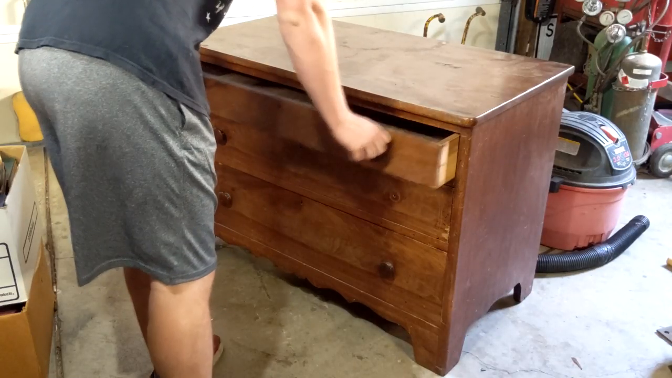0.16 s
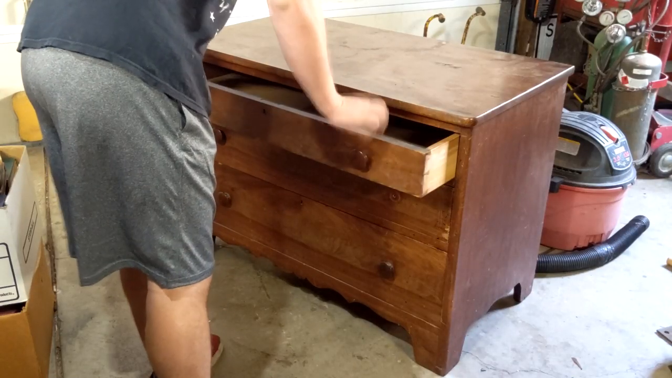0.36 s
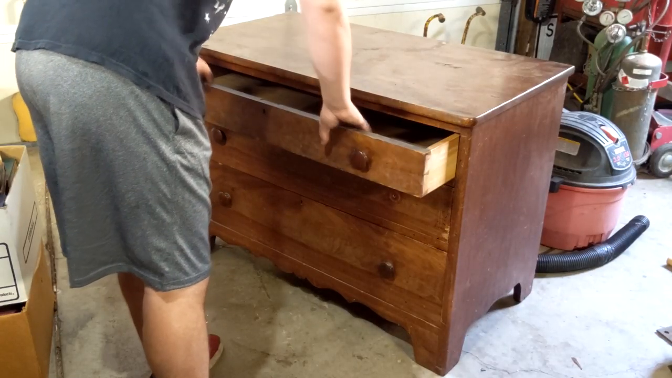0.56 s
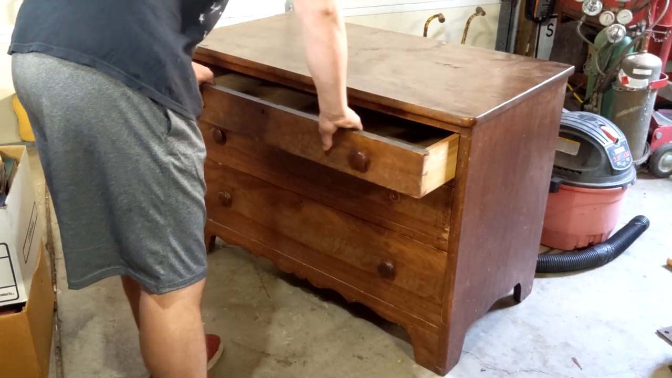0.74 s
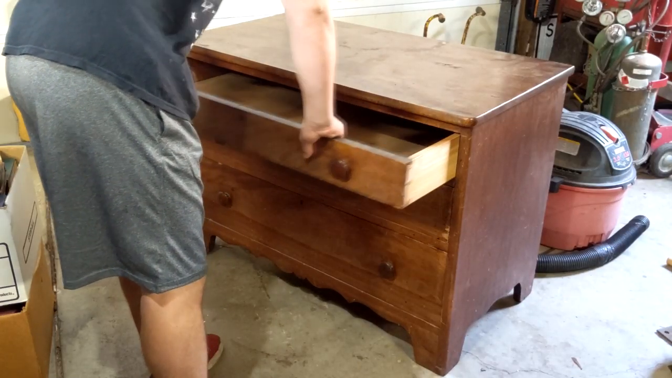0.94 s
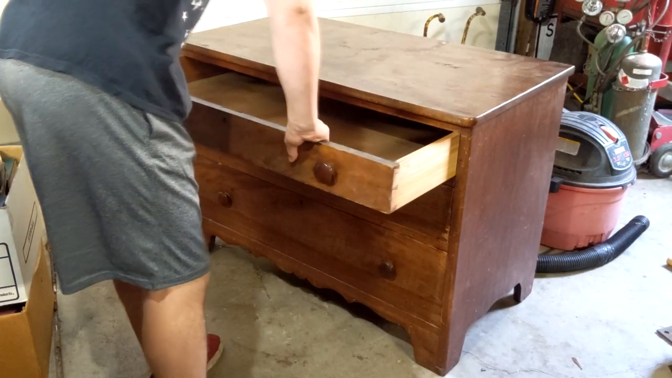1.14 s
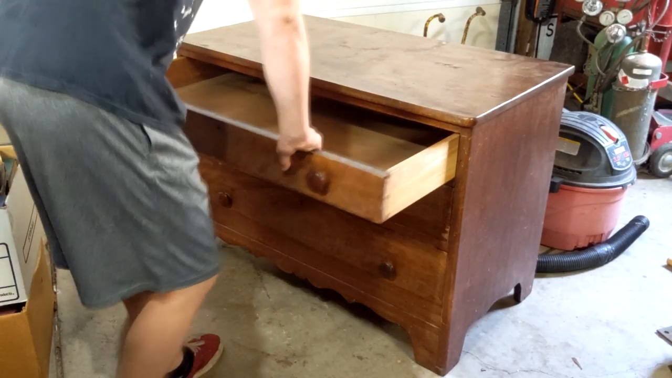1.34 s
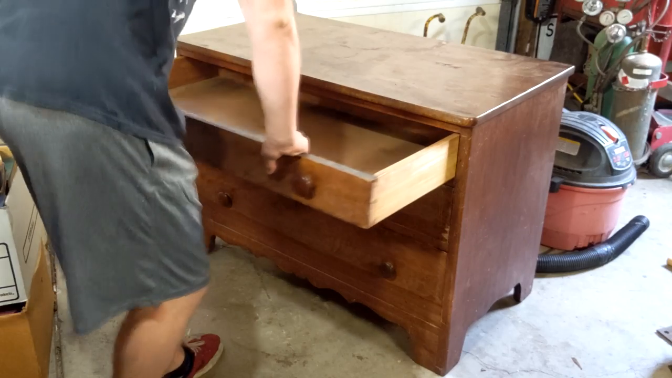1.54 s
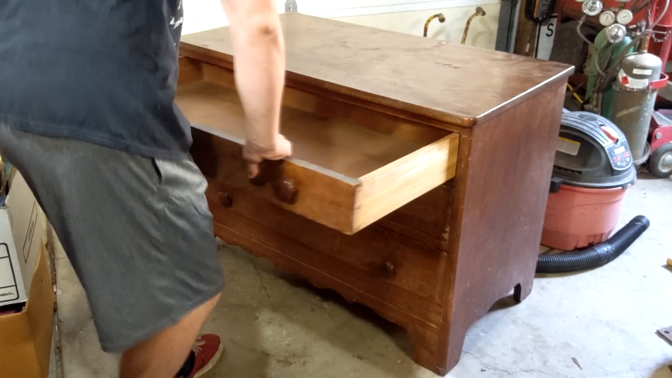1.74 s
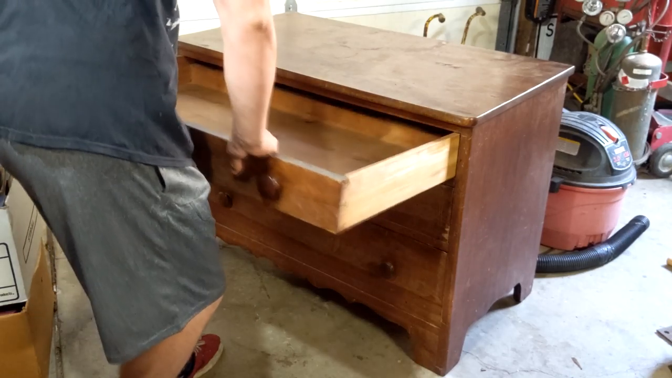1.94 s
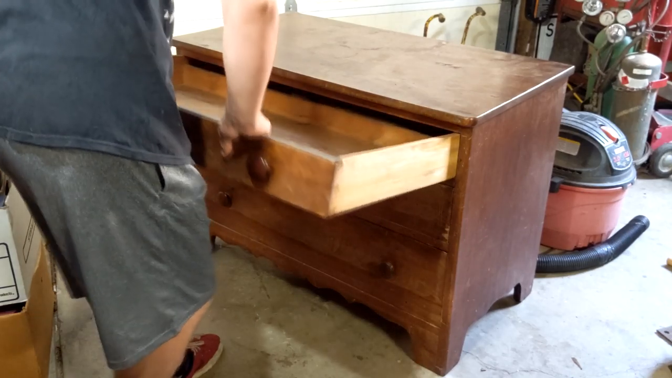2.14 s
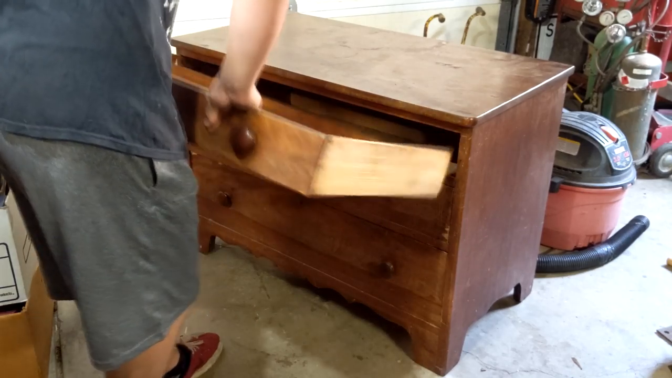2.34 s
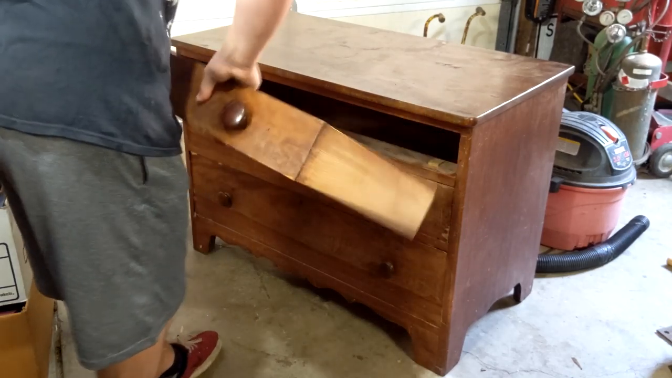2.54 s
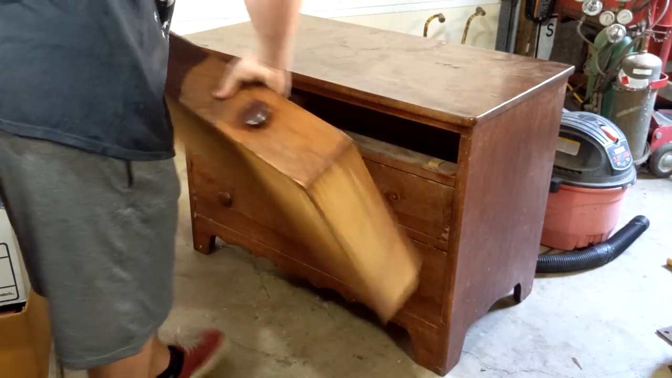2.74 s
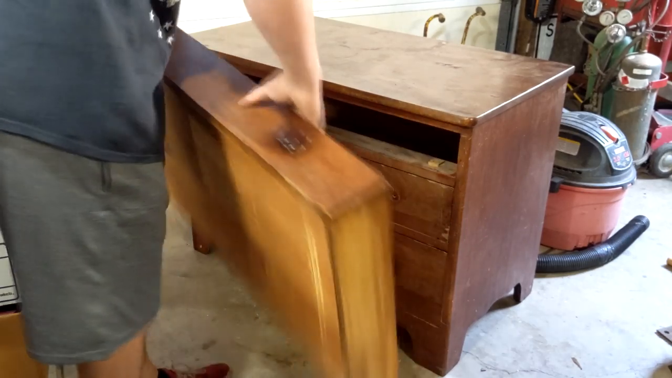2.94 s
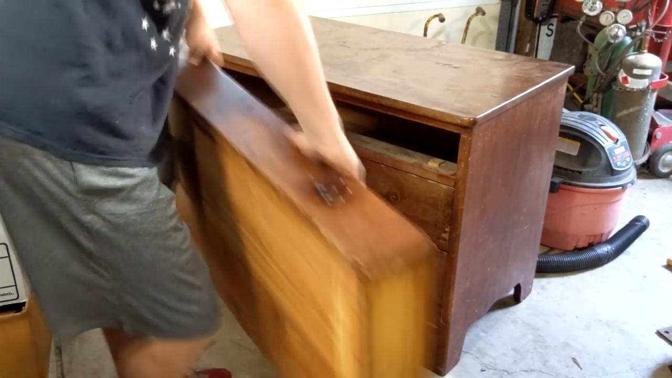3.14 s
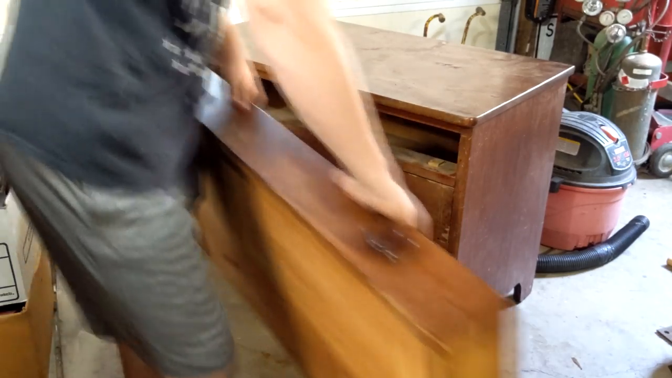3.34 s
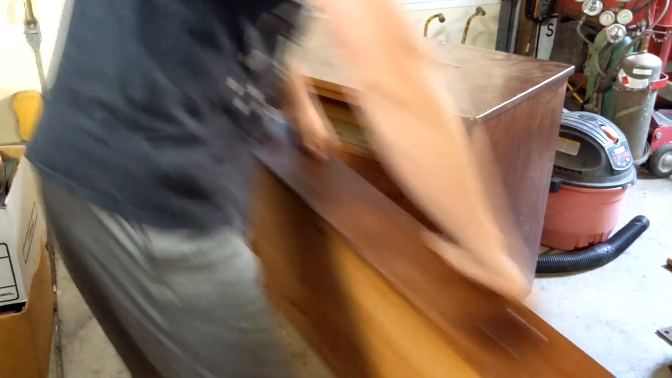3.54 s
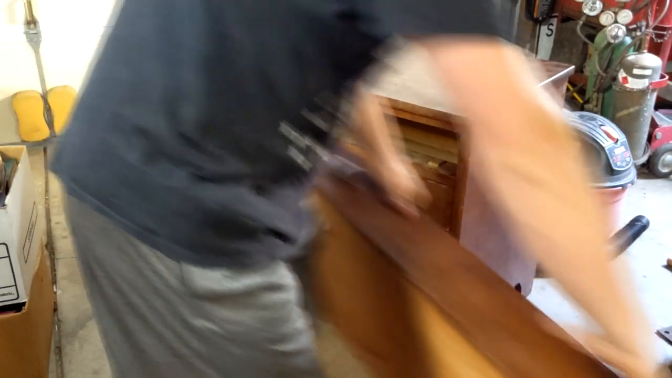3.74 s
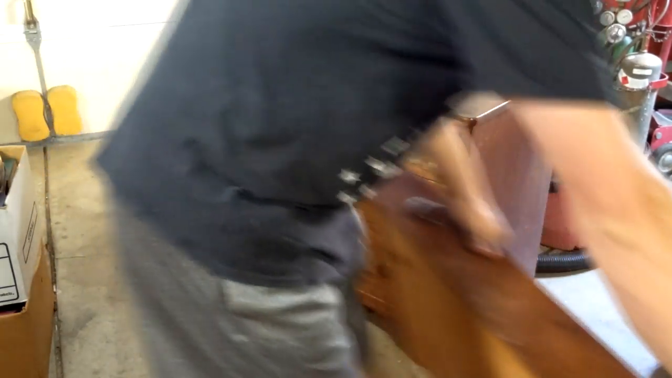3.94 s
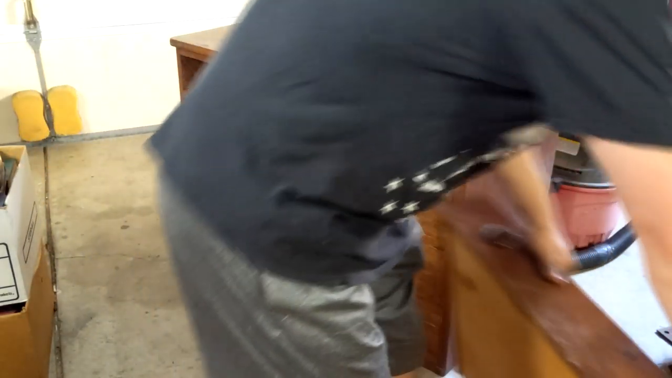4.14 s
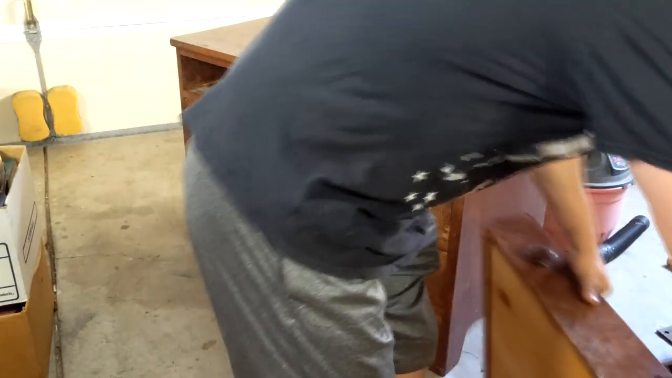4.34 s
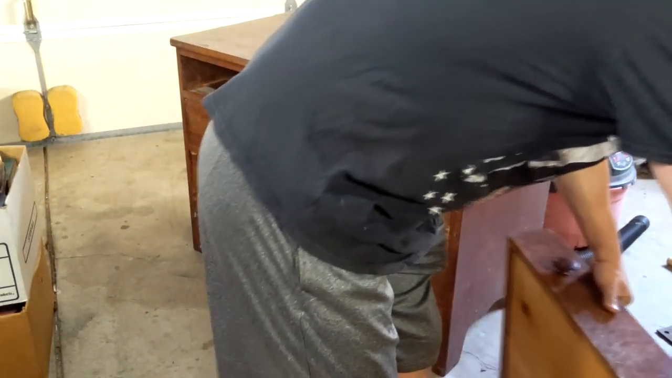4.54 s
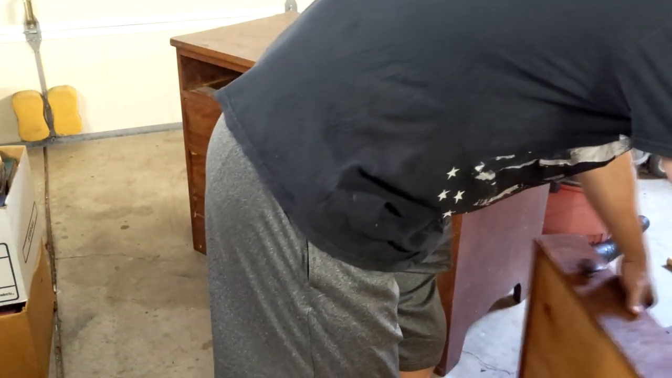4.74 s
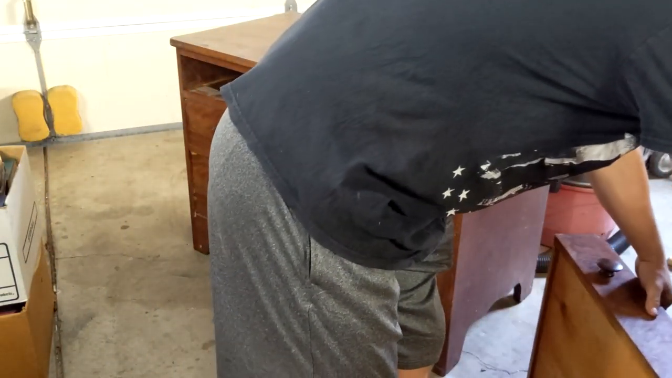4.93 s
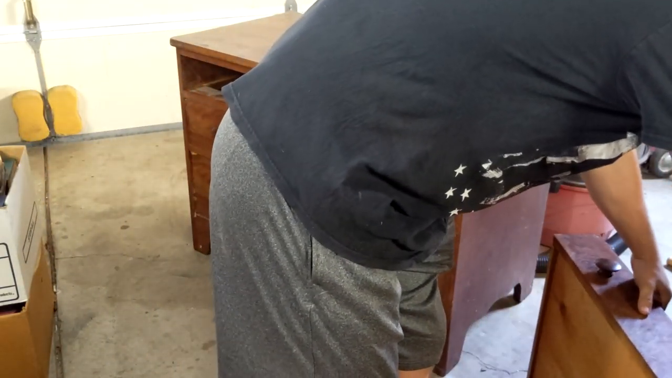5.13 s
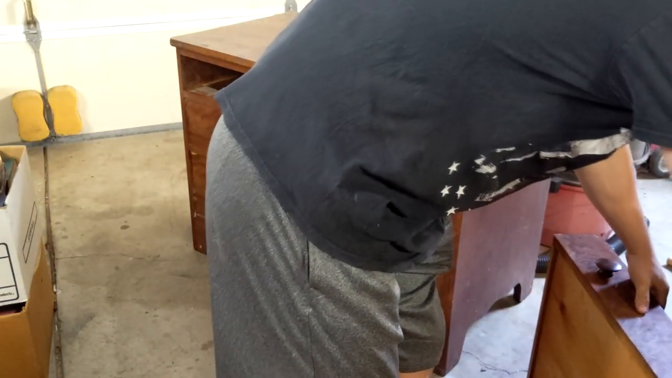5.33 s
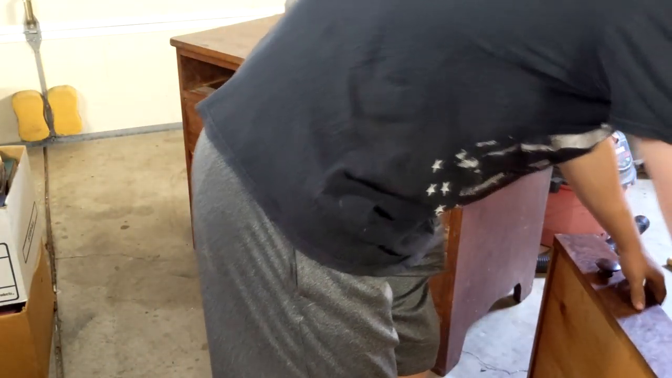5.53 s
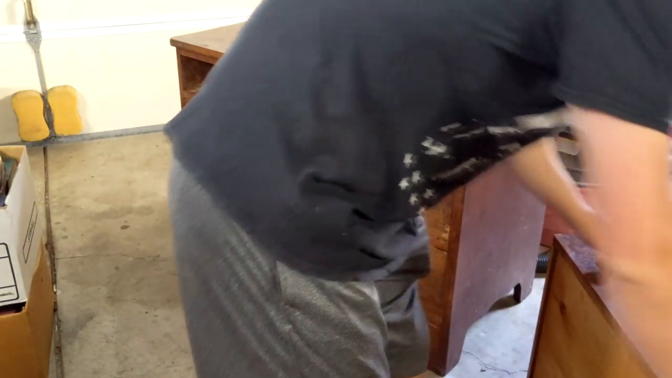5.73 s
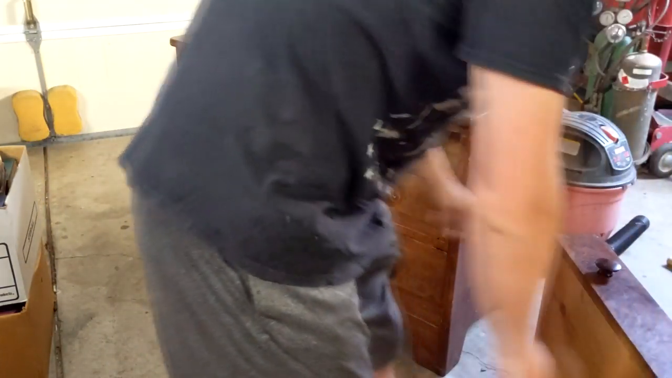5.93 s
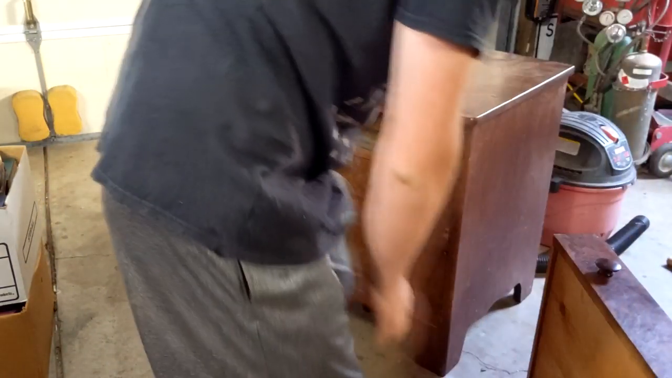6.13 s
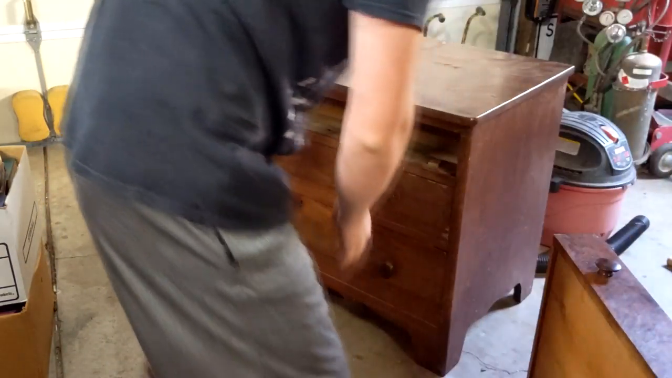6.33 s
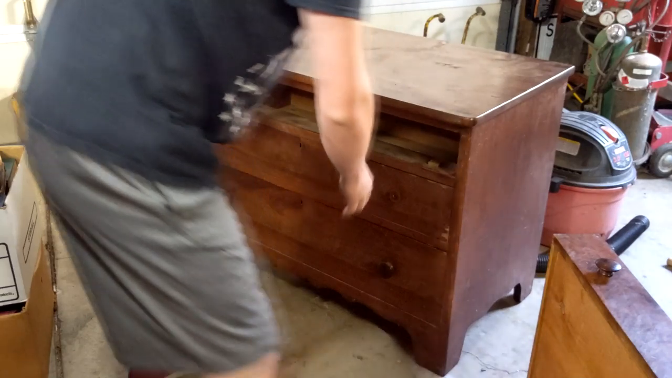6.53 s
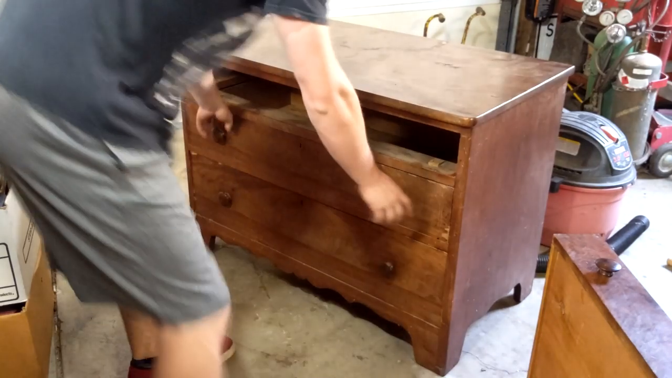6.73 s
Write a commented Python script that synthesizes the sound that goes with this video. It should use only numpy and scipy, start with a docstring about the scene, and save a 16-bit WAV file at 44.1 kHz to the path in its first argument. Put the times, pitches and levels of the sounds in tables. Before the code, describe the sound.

A wooden drawer starts rasping out of an old chest right away, moving in uneven tugs with hollow knocks at about 0.3 and 0.6 seconds. At 1 second it binds and judders with a loud, booming knock, and again more softly at 1.3 seconds. Shoes and clothes swish around 1.6 seconds, and the scraping ends with smaller bumps by 2.6 seconds. Soft steps and cloth rustle follow from 3 to 4.3 seconds. At about 4.6 seconds one corner of the drawer knocks loudly on concrete. From 4.9 to 5.3 seconds its edge grinds over grit with tiny squeaks and several knocks, then drops and settles. Clothes brush again near 6 seconds, with light taps at 6.4 and 6.6 seconds. Everything is heard in stereo in a garage with short, hard echoes and a faint steady hum.

```python
"""A wooden drawer rasps, sticks and judders on its runners as it is tugged out of an old chest.
It is carried aside and stood on the concrete, where it knocks, scrapes over grit and settles.
Each contact rings the wood's modes and thin boards; jolts make the panels boom. Shoes and clothes
brush and tap over a faint hum. Heard in stereo in a garage with close, hard walls."""
import sys
import numpy as np
from scipy import signal
from scipy.fft import rfft, irfft, next_fast_len
from scipy.io import wavfile

SR = 44100
rng = np.random.default_rng(int(sys.argv[2]) if len(sys.argv) > 2 else 0)


def put_to_file(sound):
    """Save the sound as 16-bit audio at rate SR, in the file named by the first command-line argument."""
    columns = np.atleast_2d(sound).T  # one column per channel
    safe = np.clip(columns, -1, 1)
    whole_steps = np.round(safe * 32767)
    wavfile.write(sys.argv[1], SR, whole_steps.astype(np.int16))


N = 298998
TIME = np.arange(N) / SR

# spectrum of the dense, short ring of thin boards: f/Hz, level/dB
BOARDS = [(60, -5), (150, 6.5), (400, 0), (900, -1.5), (1400, -8), (2100, -14.5), (3300, -13), (4500, -19),
          (5700, -11), (7000, -18), (10000, -15), (16000, -45)]
# tugs, each sliding the drawer until it binds: start/s, end/s, chest rumble/dB, runner rasp/dB
TUGS = [(0.083, 0.246, -52, -56), (0.234, 0.61, -42, -56.5), (0.599, 1, -40.5, -65),
        (0.998, 1.301, -43, -56.5), (1.305, 1.868, -38.5, -53.5), (1.851, 2.137, -61.5, -57.5),
        (2.14, 2.399, -43, -57.5), (2.389, 2.563, -43.5, -55.5)]


def amp(db):
    """Decibels to gain."""
    return 10 ** (np.asarray(db) / 20)


def unit(x):
    """Scale to rms 1."""
    return x / np.sqrt(np.mean(x ** 2))


def burst(x):
    """Scale to energy 1."""
    return x / np.sqrt(np.sum(x ** 2))


def add(track, s, sound):
    """Mix a sound in at s seconds."""
    i = int(s * SR)
    track[i:i + len(sound)] += sound[:N - i]


def fade(t60):
    """One second of exponential decay."""
    return np.exp(-np.log(1000) * TIME[:SR] / t60)


def swell(t, start, peak, end):
    """A rounded rise and fall between 0 and 1."""
    return np.sin(np.pi / 2 * np.interp(t, [start, peak, end], [0, 1, 0]))


def stroke(start, end, attack_s, release_s, sag_db_per_s=0):
    """A sliding movement: quick start, slow sag, dying away after its end."""
    age = np.maximum(TIME - start, 0)
    dying = np.exp(-np.maximum(TIME - end, 0) / release_s)
    return np.minimum(age / attack_s, 1) * amp(-sag_db_per_s * age) * dying


def waver(rate, depth_db):
    """A gain that wanders at random."""
    knots = rng.standard_normal(SR // 20)
    return amp(depth_db * np.interp(TIME * rate, np.arange(len(knots)), knots))


def colour(x, points):
    """Filter by a spectrum of points: f/Hz, level/dB."""
    hz, db = np.transpose(points)
    size = next_fast_len(x.shape[-1])
    f = np.fft.rfftfreq(size, 1 / SR)
    gain = amp(np.interp(np.log(f + 1), np.log(hz), db))
    return irfft(rfft(x, size) * gain, size)[..., :x.shape[-1]]


def soften(x, hz):
    """A soft contact passes little above its corner."""
    return signal.sosfilt(signal.butter(2, min(hz, SR / np.e), fs=SR, output="sos"), x)


def ring(x, response):
    """Play a force through the first half second of an impulse response."""
    return signal.fftconvolve(x, response[:SR // 2])[:N]


def modes(table):
    """One damped sine for each mode, weighted by its energy."""
    return np.array([amp(db) / np.sqrt(t60) * fade(t60) * np.sin(2 * np.pi * hz * TIME[:SR]) * (-1) ** k
                     for k, (hz, db, t60) in enumerate(table)])


def grit(rate, spread_db, size=N):
    """Tiny slips of uneven size at random moments; rms 1."""
    slips = (rng.random(size) < rate / SR) * np.sign(rng.standard_normal(size))
    return unit(slips * amp(spread_db * np.clip(rng.standard_normal(size), -2, 2)))


def diffuse(size, side_db):
    """Noise reaching the microphones from all around: alike in the bass, wide in the treble."""
    # stereo width, side against mid: f/Hz, level/dB
    width = [(40, -23.5), (120, -20), (300, -5.5), (900, -4.5), (2000, 0), (15000, 0.5)]
    mid, side = rng.standard_normal((2, size))
    side = amp(side_db) * colour(side, width)
    return np.array([mid + side, mid - side]) / np.sqrt(2)


def garage(x, wet_db, t60, side_db, pan_db, gap_s=0.0041):
    """Direct sound at the microphones, then the echoes of close, hard walls."""
    # colour of the reverberation: f/Hz, level/dB
    echo = [(60, 4.5), (150, -2), (400, 3.5), (1000, 0), (3000, 3), (15000, 1.5)]
    tail = diffuse(SR, side_db) * fade(t60) * np.clip(TIME[:SR] / gap_s - 1 / 2, 0, 1)
    response = amp(wet_db) * colour(unit(tail), echo) / np.sqrt(SR)
    response[:, 0] += 1  # the direct path
    response /= np.sqrt(1 + amp(wet_db) ** 2)
    return np.array([ring(x, h) * amp(side * pan_db / 2) for h, side in zip(response, (1, -1))])


def room_tone(air_db=-55):
    """Low rumble and airy hiss from all around, with a faint wavering hum."""
    # spectrum of the room's air: f/Hz, level/dB
    air_spectrum = [(12, -37), (20, -10), (56, 2), (108, -13), (194, -13.5), (377, -26), (470, -20),
                    (555, -26), (620, -23), (693, -23.5), (940, -24.5), (1170, -31.5), (1830, -42.5),
                    (3860, -39), (15000, -46.5)]
    # tones of the hum: f/Hz, level/dB
    hum_tones = [(51, -73), (70, -70.5), (667, -83)]
    air = amp(air_db) * unit(colour(diffuse(N, side_db=0.5), air_spectrum)) * waver(3.36, 1.0)
    hum = sum(amp(db) * unit(np.sin(2 * np.pi * hz * TIME) * waver(8.1, 3.3)) for hz, db in hum_tones)
    return air + hum


def footwork(rise_share=0.58, rustle_db=-70.5, tap_t60=0.02, tap_octaves=0.76):
    """Soles and cloth brush in soft swishes; steps and touches give short dull taps."""
    # shoes and clothes brushing: peak t/s, length/s, level/dB
    brushes = [(1.34, 0.081, -55), (1.434, 0.083, -51), (1.587, 0.19, -43), (3.145, 0.33, -53.5),
               (3.367, 0.22, -63), (3.67, 0.069, -65), (4.01, 0.12, -68), (4.234, 0.064, -59.5),
               (5.934, 0.34, -53.5), (6.221, 0.13, -61.5), (6.388, 0.048, -54), (6.654, 0.12, -62.5),
               (6.78, 0.14, -61.5)]
    # spectrum of the brushing: f/Hz, level/dB
    brush_spectrum = [(150, -20), (500, 1), (1000, 0.5), (2000, -5), (3100, -0.5), (4400, -5), (5800, -1.5),
                      (7000, -7.5), (10000, -11), (15000, -18)]
    # light steps and taps: t/s, level/dB, centre f/Hz, contact/s
    taps = [(2.98, -26.5, 740, .05), (3.105, -24.5, 430, .035), (3.181, -17, 845, 0.019),
            (3.644, -30, 750, 0.0043), (3.99, -22.5, 614, 0.047), (4.293, -29, 750, 0.014),
            (6.362, -22.5, 990, 0.016), (6.618, -16, 980, 0.00076)]
    pressure = sum(amp(db) * swell((TIME - s) / length, -rise_share, 0, 1 - rise_share) ** 2
                   for s, length, db in brushes)
    carrying = stroke(3.61, 4.5, attack_s=0.088, release_s=0.08)
    pressure += amp(rustle_db) * carrying * waver(11, 1.4)
    out = unit(colour(grit(7000, 3.2), brush_spectrum)) * pressure * waver(80, 1.78)
    for s, db, hz, contact in taps:
        band = signal.butter(2, [hz / 2 ** tap_octaves, hz * 2 ** tap_octaves], "band", fs=SR,
                             output="sos")
        push = ring(fade(tap_t60), np.hanning(int(contact * SR) + 3))[:SR]
        tap = soften(signal.sosfilt(band, rng.standard_normal(SR) * push), 1.27 * hz)
        add(out, s, amp(db) * burst(tap))
    return out


def booms(hits, notes, linger_db=-16, linger_t60=0.59):
    """A panel and the air behind it trade energy, so each note swells, drops and lingers faintly."""
    out = np.zeros(N)
    for s, *levels in hits:
        for db, (hz, rise) in zip(levels, notes):
            age = TIME[:SR] / rise
            bloom = (age * np.exp(1 - age)) ** 2
            linger = amp(linger_db) * np.tanh(age) * fade(linger_t60)
            add(out, s, amp(db) * (bloom + linger) * np.sin(2 * np.pi * hz * TIME[:SR]))
    return out


def panels(flex_db=-3, flex_lag_s=0.0518):
    """Jolts boom in the carcass; tugs and landings flex the drawer bottom."""
    # deep notes of the hollow carcass: f/Hz, swell/s
    carcass = [(112.3, 0.029), (260, 0.02), (448, 0.023)]
    # jolts to the carcass: t/s, low note/dB, middle note/dB, high note/dB
    jolts = [(.295, -40, -40.5, -35.5), (.602, -21.5, -45.5, -50), (1.018, -30.5, -26, -37.5),
             (1.325, -39, -54, -56), (2.155, -68, -42, -41)]
    # notes of the drawer's thin bottom: f/Hz, swell/s
    bottom = [(52, 0.072), (147, 0.022)]
    # landings that flex the bottom: t/s, low note/dB, high note/dB
    landings = [(4.641, -60, -30.5), (4.942, -44, -38), (5.135, -54, -45), (5.202, -39.5, -37)]
    bends = [(start + flex_lag_s, db + flex_db) for start, _, db, _ in TUGS]  # low note only
    return booms(jolts, carcass) + booms(bends + landings, bottom)


def blows(contacts, box_modes, boards_db, boards_t60, vary):
    """Contacts on a wooden box: each spot rings its own mix of clear modes and dense board ring."""
    size = SR // 2
    out = np.zeros(N)
    shapes, dying = modes(box_modes)[:, :size], fade(boards_t60)[:size]
    for s, db, corner_hz in contacts:
        clear = (1 + vary * rng.standard_normal(len(box_modes))) @ shapes
        dense = colour(rng.standard_normal(size), BOARDS) * dying
        wood = burst(burst(clear) + amp(boards_db) * burst(dense))
        add(out, s, amp(db) * soften(wood, corner_hz))
    return out


def squeaks(detune=0.017, rise_s=0.013, length_s=0.023):
    """The drawer's edge catches on grit; each catch grips a new spot, which shifts the pitches."""
    # modes of end grain squeaking on grit: f/Hz, level/dB, t60/s
    end_grain = [(1190, 0, 0.041), (2100, -4, 0.027), (2436, 0, 0.049), (2820, -1, 0.051),
                 (3150, -3, 0.028), (3500, -5, 0.026), (4080, -11, .02), (4470, -9, 0.018),
                 (5470, -3, 0.011), (5860, 0, 0.012)]
    # the edge catching: t/s, level/dB
    catches = [(5.011, -43.5), (5.03, -41.5), (5.05, -42.5), (5.068, -49), (5.212, -51)]
    out = np.zeros(N)
    for start, db in catches:
        spot = [(hz * (1 + detune * rng.standard_normal()), level, t60) for hz, level, t60 in end_grain]
        slips = grit(2200, 3.1, size=SR) * swell(TIME[:SR], 0, rise_s, length_s)
        add(out, start, amp(db) * ring(slips, burst(modes(spot).sum(axis=0))))
    return out


def drawer_on_floor(drag_db=-42.5, crunch_t60=0.084, crunch_rise_s=0.0031):
    """One corner lands, the edge grinds and squeaks over grit, then the rest drops."""
    # modes of the free drawer: f/Hz, level/dB, t60/s
    drawer_modes = [(144, 1.5, 0.19), (175, 1.5, 0.044), (254, 3.5, 0.26), (332.7, -9.5, 0.51),
                    (449, -11.5, 0.12), (600, -18, 0.037), (667, -12, 0.042), (774, -1.5, 0.063),
                    (924, -4.5, 0.097), (1009, -5.5, 0.063), (1293, -10, 0.058), (1366, -10.5, 0.075),
                    (1508, -7, 0.038), (1738, -7.5, .04), (2855, -9, 0.026), (3244, -4, 0.025),
                    (3500, -11, 0.014)]
    # drawer meeting concrete: t/s, blow/dB, contact corner f/Hz, crunch/dB
    knocks = [(4.638, 2.5, 2000, -13), (4.65, 5, 1340, -17), (4.673, -3.5, 900, -26),
              (4.916, -15, 4000, -22), (4.938, -3.5, 3520, -10), (4.956, -0.5, 2470, -18),
              (4.99, -7.5, 1630, -29), (5.018, -5, 1510, -14.5), (5.133, -10.5, 2000, -17),
              (5.146, -4.5, 302, -18.5), (5.198, 0.5, 4540, -15.5), (5.226, -7.5, 445, -24)]
    # spectrum of crushed grit: f/Hz, level/dB
    crunch = [(300, -20), (1200, -2), (2100, -4), (3300, 0), (4500, -2), (5700, -1), (7000, -8),
              (10000, -11), (13000, -17), (16000, -22)]
    out = blows([row[:3] for row in knocks], drawer_modes, boards_db=2, boards_t60=0.096, vary=0.57)
    drag = amp(drag_db) * stroke(4.93, 5.16, attack_s=0.024, release_s=0.04, sag_db_per_s=7)
    scrape = colour(grit(1300, 5), BOARDS) / 2
    body = ring(grit(830, 5), burst(modes(drawer_modes).sum(axis=0)))
    out += drag * unit(scrape + body)
    crushing = fade(crunch_t60) * np.tanh(TIME[:SR] / crunch_rise_s)
    for s, _, _, db in knocks:
        grains = colour(grit(8000, 5, size=SR), crunch)
        add(out, s, amp(db) * burst(grains * crushing))
    return out + squeaks()


def tugging(attack_s=0.03, release_s=0.04):
    """Strength of the rumble and of the rasp; both sag as the drawer slows after each tug."""
    rumble, rasp = np.zeros((2, N))
    for start, end, rumble_db, rasp_db in TUGS:
        rumble += amp(rumble_db) * stroke(start, end, attack_s, release_s, sag_db_per_s=25)
        rasp += amp(rasp_db) * stroke(start, end, attack_s, release_s, sag_db_per_s=9.5)
    return rumble, rasp


def judder(slips_per_s=140, rise_share=0.22, jitter=0.1197, scatter_db=1.5):
    """The drawer binds and lets go in a quick, uneven train of slips."""
    # stick-slip on the runners: start/s, length/s, level/dB, contact corner f/Hz
    judders = [(0.267, 0.13, -13, 550), (.994, 0.13, -2.5, 1100), (1.303, 0.11, -11.5, 865),
               (1.539, .09, -20, 630), (2.12, 0.12, -11.5, 700)]
    slips = []
    for start, length, db, hz in judders:
        timing, strength = rng.standard_normal((64, 2)).T
        ages = np.cumsum(np.exp(jitter * timing)) / slips_per_s
        swell_db = 20 * np.log10(swell(ages / length, 0, rise_share, 1) + 1e-9)
        levels = db + scatter_db * strength + swell_db
        slips += [(start + age, level, hz) for age, level in zip(ages, levels) if age < length]
    return slips


def drawer_in_chest(rumble_hz=135, grain_db=-2):
    """Knocks, judder and sliding friction all shake the same carcass."""
    # modes of the chest with the drawer in it: f/Hz, level/dB, t60/s
    chest_modes = [(114.5, -2, 0.29), (166.7, -11.5, 0.49), (192, -11, 0.18), (260, -1.5, 0.097),
                   (289.6, -6.5, 0.2), (341.3, -4.5, 0.28), (412, -7.5, 0.16), (444.8, -2, 0.23),
                   (562, -4, 0.088), (626.4, -2, 0.082), (687, -2.5, .15), (740, -18, 0.1), (805, -9, 0.12),
                   (878, -2, 0.27), (980, -9, 0.07), (1118, -18, 0.19), (1330, -14, 0.12),
                   (1470, -8, 0.049), (1660, -12, 0.18)]
    # drawer knocking inside the chest: t/s, level/dB, contact corner f/Hz
    knocks = [(.101, -18.5, 3000), (.296, -4.5, 654), (.603, -8.5, 5000), (1.004, -5, 900),
              (1.011, -2.5, 3580), (1.029, 2, 2200), (1.042, 5.5, 650), (1.323, -6.5, 990),
              (1.338, -5.5, 600), (1.875, -21, 2500), (2.13, -14, 1104), (2.175, -12, 696),
              (2.235, -5.5, 252), (2.53, -19, 700)]
    # spectrum of the rasping runners: f/Hz, level/dB
    rasp_spectrum = [(100, 2), (300, 4.5), (800, 6), (1500, 2), (2100, -2.5), (3000, -3), (5800, -6.5),
                     (6800, -11), (9500, -14.5), (15000, -31)]
    rumble, rasp = tugging()
    bumps = grit(900, 4.6)
    body = unit(ring(bumps, modes(chest_modes).sum(axis=0)))
    grain = amp(grain_db) * unit(colour(bumps, BOARDS))
    rumbling = unit(soften(body + grain, rumble_hz)) * rumble
    rubbing = unit(colour(grit(2000, 1.9), rasp_spectrum)) * rasp * waver(40, 3.05)
    knocking = blows(knocks + judder(), chest_modes, boards_db=2.5, boards_t60=0.097, vary=1.0)
    return knocking + rumbling + rubbing


def scene():
    """The chest is in plain view of the microphones; the landing arrives mostly by way of the walls."""
    sliding = garage(drawer_in_chest(), wet_db=-1.5, t60=0.29, side_db=3.5, pan_db=1.9)
    landing = garage(drawer_on_floor(), wet_db=3.5, t60=0.33, side_db=3.0, pan_db=1.5)
    steps = garage(footwork(), wet_db=2.5, t60=0.31, side_db=1.5, pan_db=2.0)
    bass = panels() * amp([[0.4], [-0.4]])  # long waves reach both sides almost alike
    return sliding + landing + steps + bass + room_tone()


def record(dry):
    """The recorder cuts the top steeply."""
    top_hz = 15800
    return signal.sosfilt(signal.ellip(10, 0.1, 80, top_hz, fs=SR, output="sos"), dry)


dry = scene()
out = record(dry)
put_to_file(out)
```